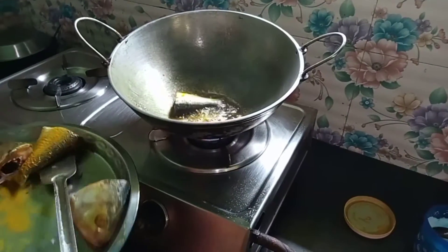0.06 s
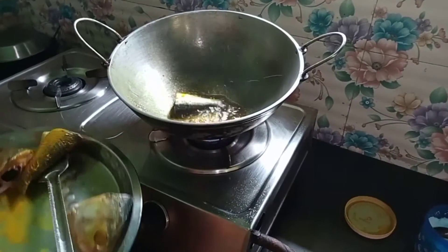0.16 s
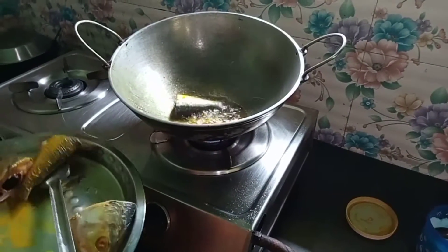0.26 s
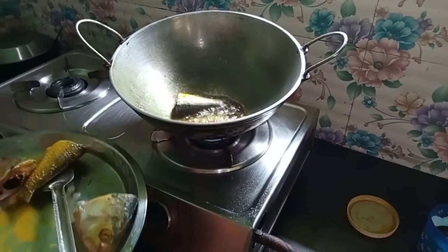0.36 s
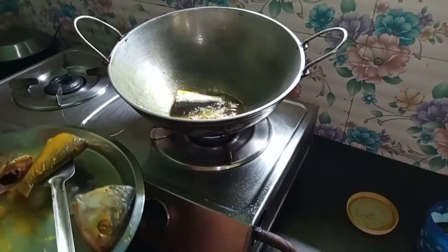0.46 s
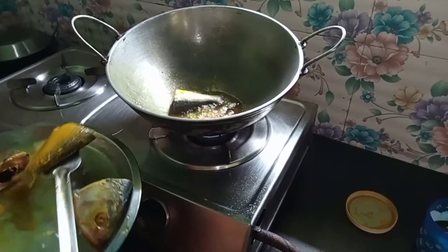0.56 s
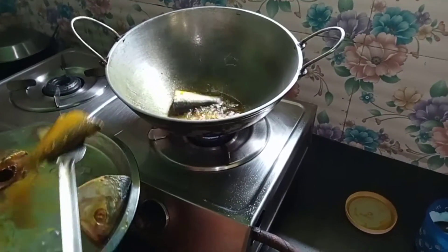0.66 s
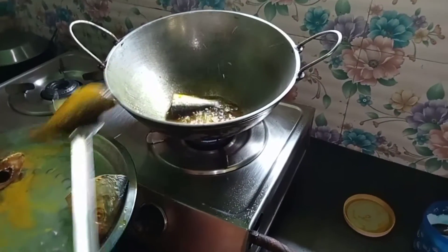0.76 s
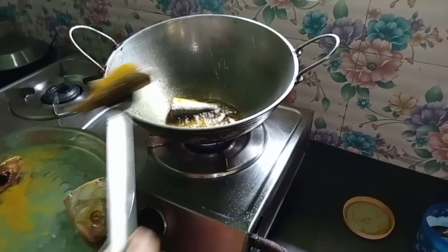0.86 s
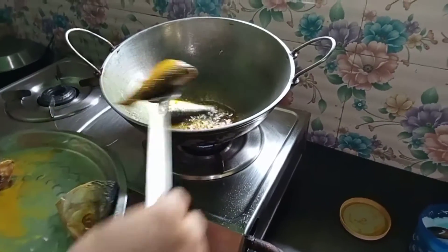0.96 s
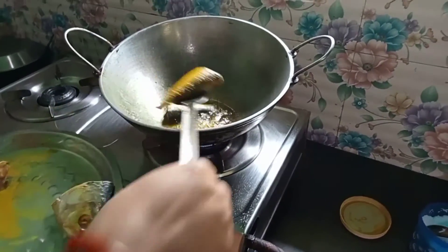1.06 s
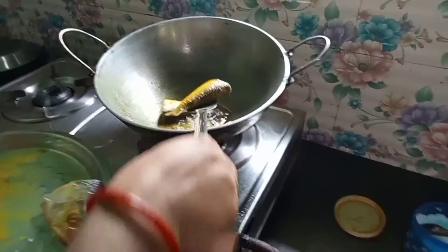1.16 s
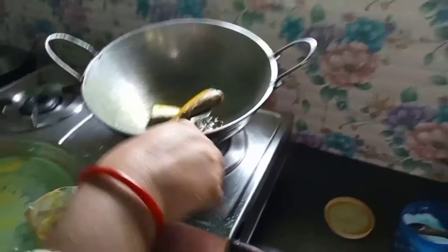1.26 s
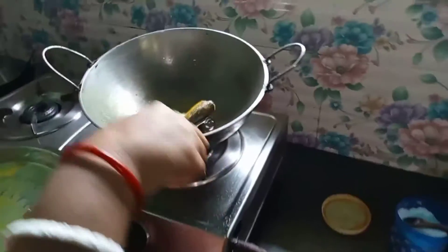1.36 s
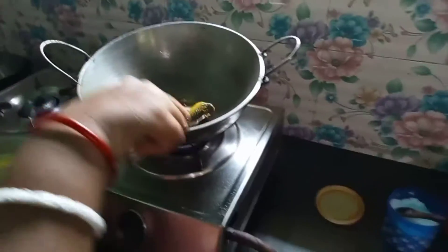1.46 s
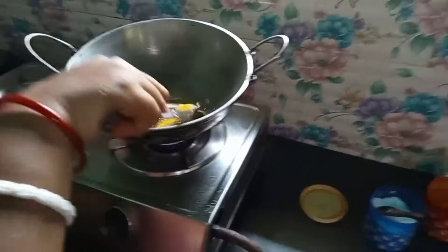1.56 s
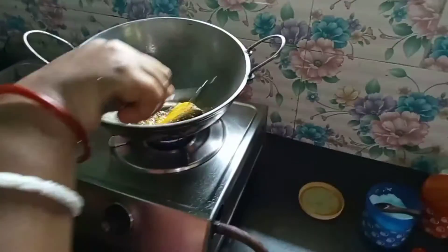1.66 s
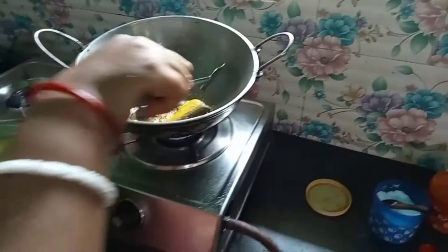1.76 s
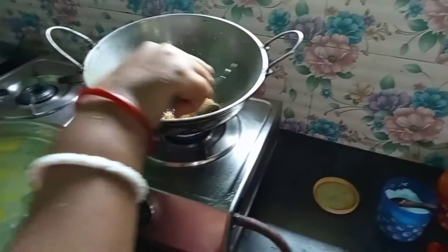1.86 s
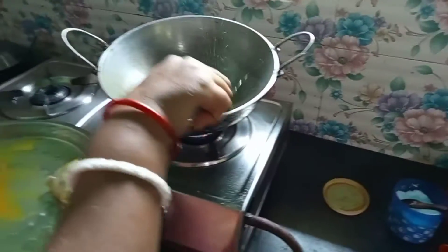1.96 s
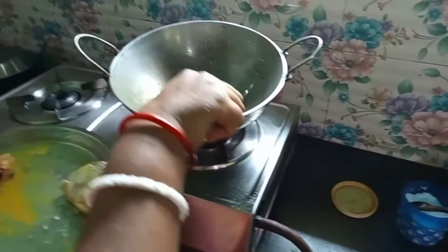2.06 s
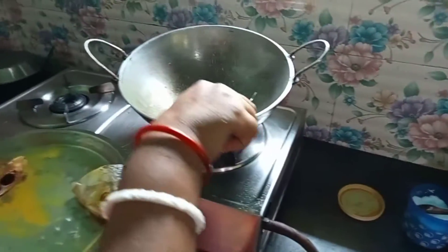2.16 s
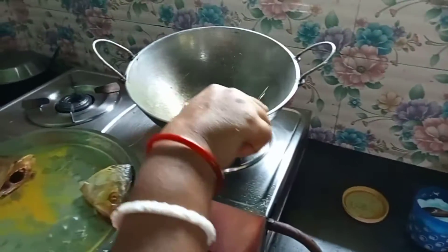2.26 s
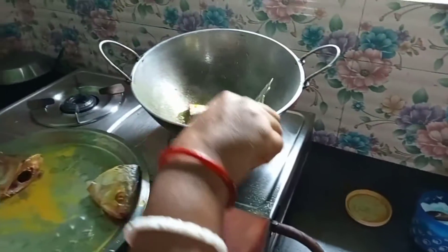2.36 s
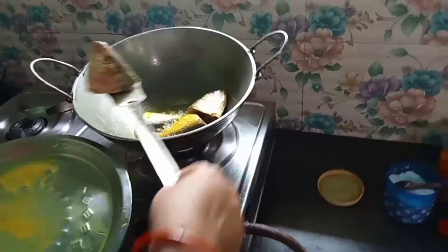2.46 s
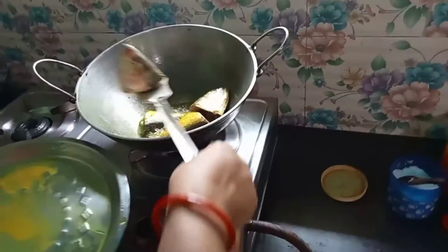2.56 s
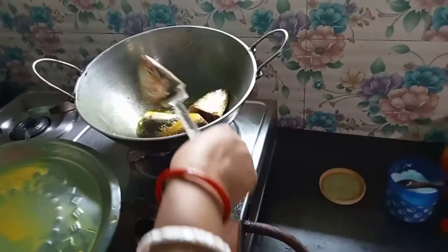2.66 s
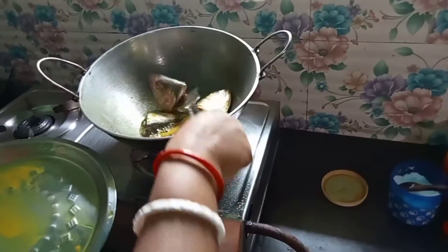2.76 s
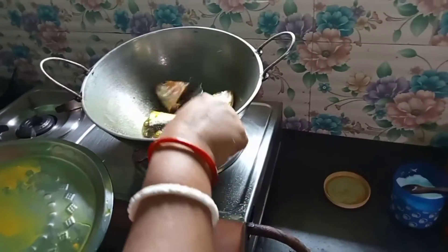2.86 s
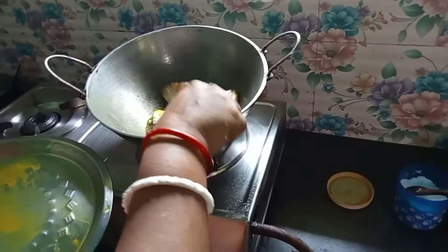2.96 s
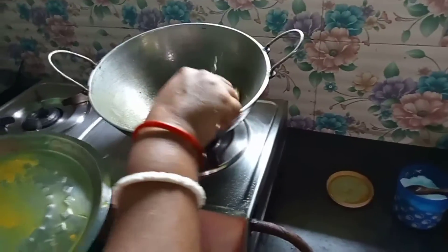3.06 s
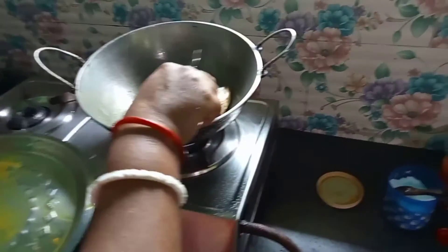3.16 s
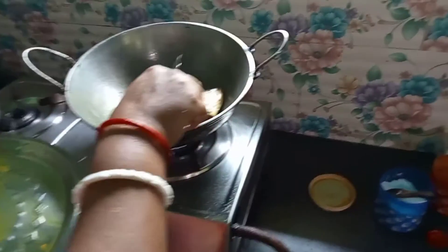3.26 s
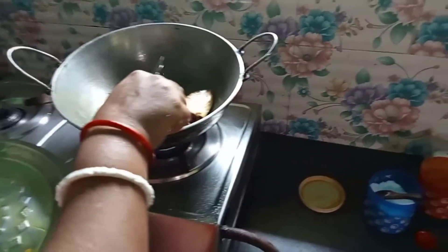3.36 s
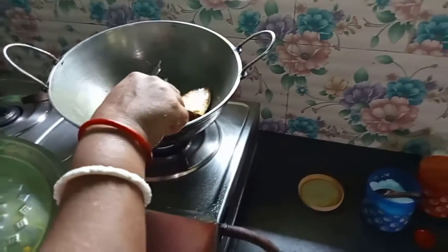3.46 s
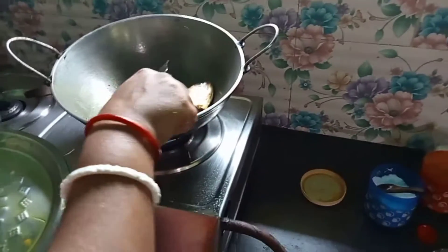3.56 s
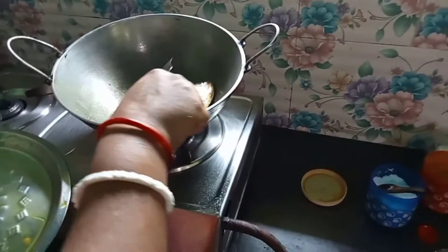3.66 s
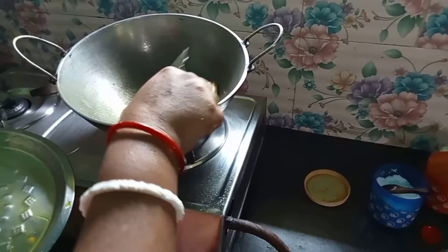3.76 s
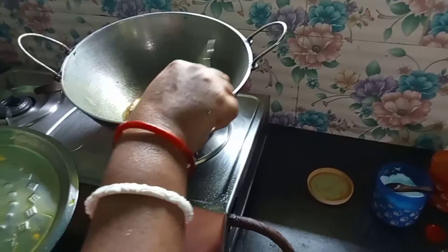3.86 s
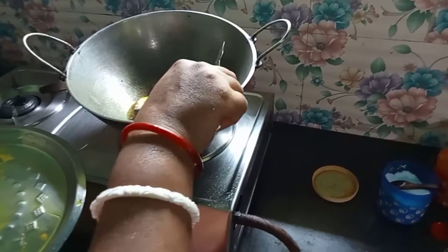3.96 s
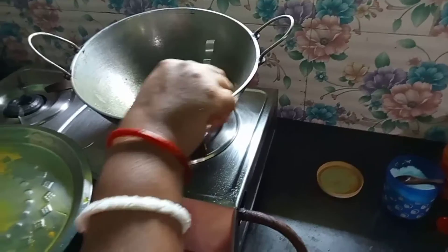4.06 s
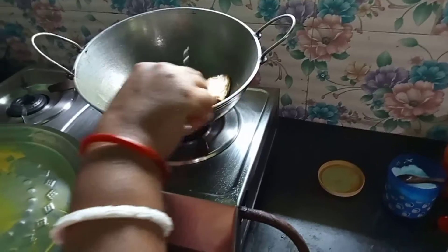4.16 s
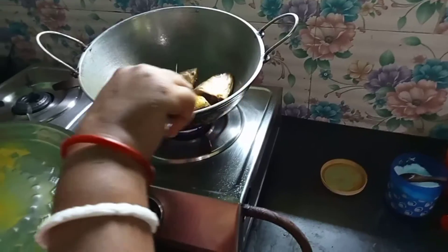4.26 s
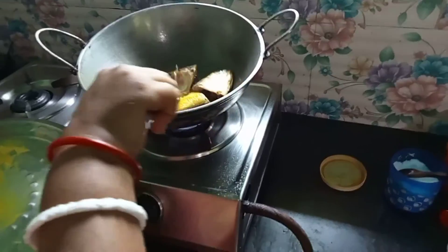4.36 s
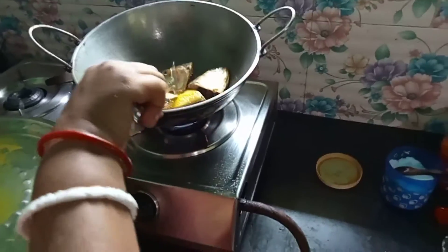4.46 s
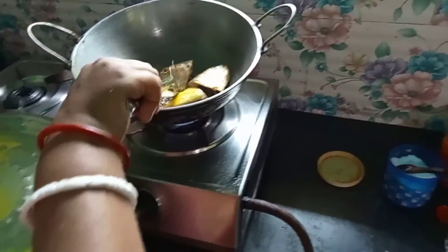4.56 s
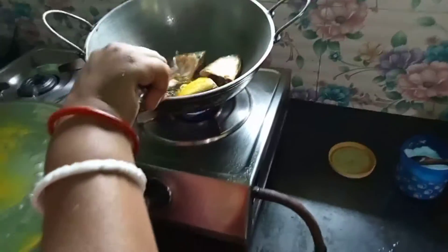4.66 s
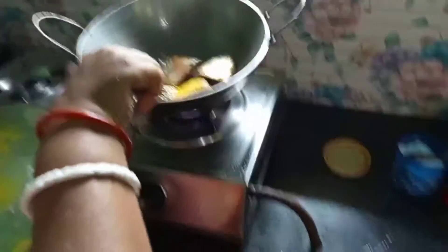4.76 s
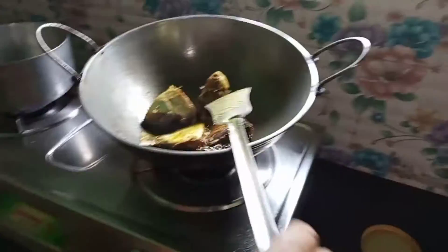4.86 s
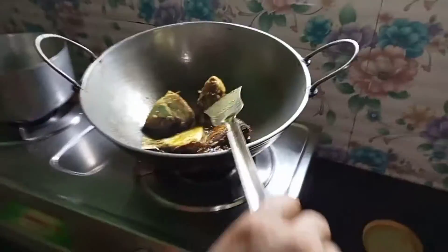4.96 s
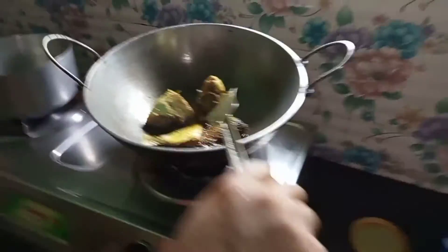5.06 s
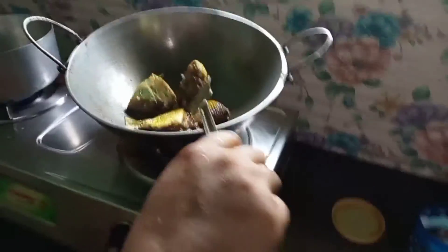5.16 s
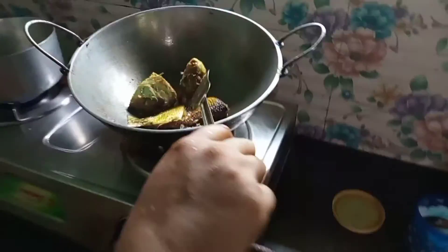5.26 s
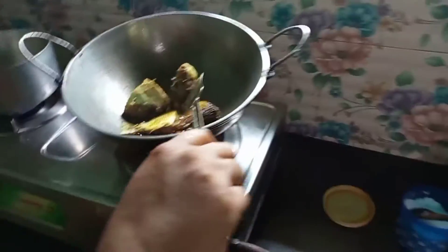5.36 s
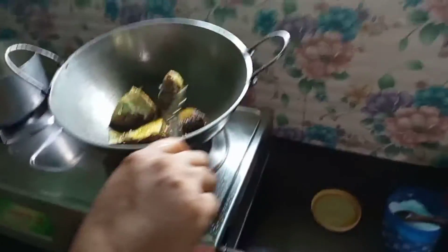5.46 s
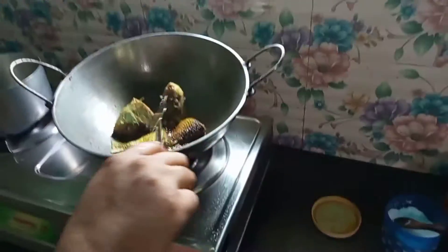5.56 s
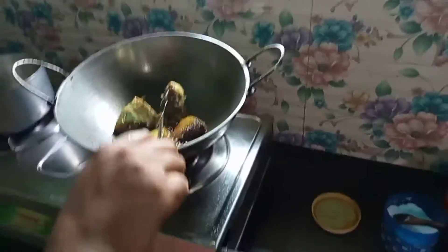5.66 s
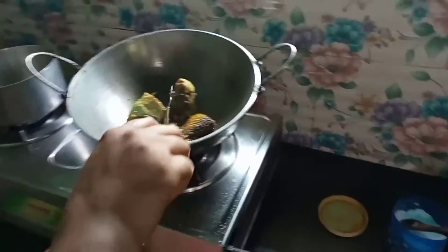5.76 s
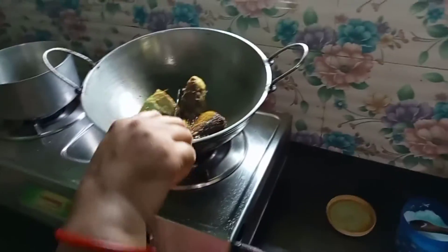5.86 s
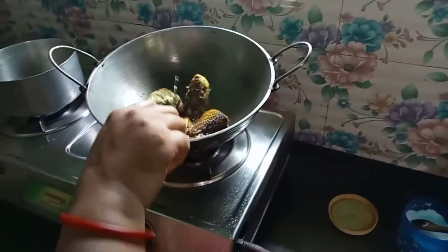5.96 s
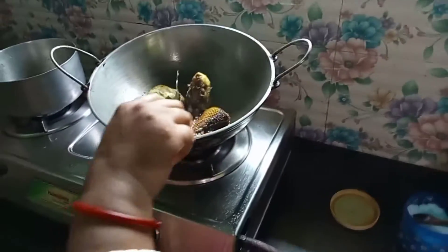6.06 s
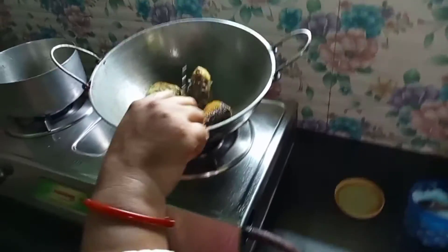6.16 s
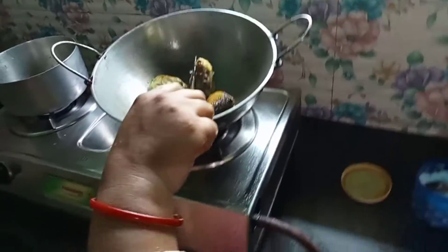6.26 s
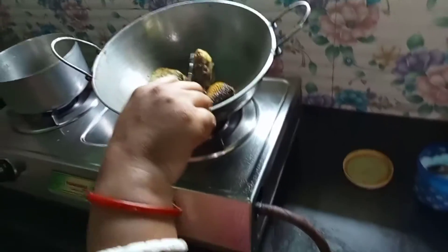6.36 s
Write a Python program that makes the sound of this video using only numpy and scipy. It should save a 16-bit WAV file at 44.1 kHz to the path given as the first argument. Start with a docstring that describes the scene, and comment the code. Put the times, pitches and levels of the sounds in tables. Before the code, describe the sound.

Close, dry sizzling of wet fish pieces in oil swells with steel scrapes and pops, then cuts to sparse crackling and fat spits.

```python
"""Fish frying in a steel pan

In a kitchen, close up with no room echo, fish fries in hot oil in a round steel pan: noise puffs for steam bubbles.
The sizzle swells as new pieces go in, then the sound cuts to a quieter, patchier boil. Fat spits in pitched
puffs and spray; a turner scrapes plate and pan as bursts in two steel registers. A phone microphone hears it
in mono, over a low kitchen rumble of filtered noise with brief hums and a few bumps."""
import sys
import numpy as np
from scipy import signal
from scipy.fft import rfft, irfft, next_fast_len
from scipy.io import wavfile
from scipy.ndimage import uniform_filter1d, map_coordinates

SR = 44100
rng = np.random.default_rng(int(sys.argv[2]) if len(sys.argv) > 2 else 0)


def put_to_file(sound):
    """Save the sound as 16-bit audio at rate SR, in the file named by the first command-line argument."""
    columns = np.atleast_2d(sound).T  # one column per channel
    safe = np.clip(columns, -1, 1)
    whole_steps = np.round(safe * 32767)
    wavfile.write(sys.argv[1], SR, whole_steps.astype(np.int16))


N = 282240
T = np.arange(N) / SR
CUT_S = 4.881  # the sound cuts here to a quieter, patchier boil


def amp(db):
    """Gain of a dB value."""
    return 10 ** (np.asarray(db) / 20)


def unit(x):
    """x at rms 1."""
    return x / np.sqrt(np.mean(x ** 2) + 1e-20)


def curves(table):
    """One value per sample for each column after the time."""
    s, *cols = np.transpose(table)
    return [np.interp(T, s, c) for c in cols]


def wobble(rate):
    """A smooth random curve, rate knots a second."""
    return map_coordinates(rng.standard_normal(int(N * rate / SR) + 4), [T * rate])


def filtered(x, response):
    """x through a response given as a function of frequency in Hz."""
    m = next_fast_len(N + 8192)
    return irfft(rfft(x, m) * response(np.fft.rfftfreq(m, 1 / SR)), m)[..., :N]


# Steady resonances of the pan: pitch_hz, width_hz, level_db
PAN_RESONANCES = [(446, 120, 4), (552, 9, 7.5), (652, 32, 7), (1142, 15, 6), (1285, 5.7, 12.5),
                  (1514, 44, 3.5), (1845, 43, 8), (2010, 9, -1), (2330, 27, 6), (2820, 10, 9.5),
                  (3023, 15, 9), (3265, 19, 7)]


def coloured(x, spectrum):
    """x at rms 1 through spectrum points on a log pitch axis, with the pan resonances added in dB."""
    points_hz, points_db = np.transpose(spectrum)

    def response(hz):
        spectrum_db = np.interp(np.log(hz + 1), np.log(points_hz + 1), points_db)
        pan_db = sum(db / (1 + (2 * (hz - centre) / width) ** 2) for centre, width, db in PAN_RESONANCES)
        return amp(spectrum_db + pan_db)

    return unit(filtered(x, response))


def narrow(length, hz, width_hz):
    """Noise of rms 1 around one pitch."""
    f = np.fft.rfftfreq(length, 1 / SR)
    resonance = 1 / (1 + (2 * (f - hz) / width_hz) ** 2)
    return unit(irfft(rfft(rng.standard_normal(length)) * resonance, length))


def bursts(rate, size, life_s, patchy_db, whistle_db):
    """Short noise puffs of random size, rate a second, on a noise bed with broad patches and narrow streaks."""
    starts = (rng.random(N) < rate / SR) * size * rng.exponential(size=N)
    puffs = signal.lfilter([1], [1, -np.exp(-1 / (life_s * SR))], starts)
    z = signal.stft(rng.standard_normal(N) * (1 + puffs), nperseg=1024)[2]

    def field(bins, frames):
        across_pitch = uniform_filter1d(rng.standard_normal(z.shape), bins, 0)
        return unit(uniform_filter1d(across_pitch, frames, 1))

    patches = patchy_db * field(12, 4)
    streaks = whistle_db * field(2, 12)
    return signal.istft(z * amp(patches + streaks), nperseg=1024)[1][:N]


def struck(times, peaks_db, t60s):
    """Envelope of sudden starts that die away, each for up to half a second."""
    env = np.zeros(N)
    for s, db, t60 in zip(times, peaks_db, t60s):
        first = round(s * SR)
        age = T[first:][:SR // 2] - s
        env[first:][:SR // 2] += amp(db - 60 * age / max(t60, .005))
    return env


def held(times, hold_s, rise_s, t60):
    """One row per event: a quick rise to 1 and an exponential release that starts hold_s after the start."""
    age = T - times[:, None]
    release_age = np.clip(age - hold_s[:, None], 0, 2)
    return np.clip(age / rise_s, 0, 1) * amp(-60 * release_age / t60)


def stacked(bed_db, shapes, peaks_db):
    """Gain of a bed and the events on top of it, added in power."""
    return np.sqrt(amp(2 * bed_db) + amp(2 * peaks_db) @ shapes ** 2)


def until_cut(times):
    """One row per event: whatever began before the cut ends there."""
    return (T < CUT_S) | (times[:, None] > CUT_S)


# Kitchen rumble, before a 0.5 dB cut and a random wobble: start_s, level_db
ROOM_LEVEL = [(0.0, -53.5), (0.9, -59.5), (1.5, -54.5), (2.1, -56.5), (2.6, -53), (2.97, -55.5), (3.8, -62),
              (4.6, -59.5), (5.0, -51.5), (5.78, -53.5), (6.4, -46.5)]
# Colour of the rumble: pitch_hz, level_db (relative)
RUMBLE_COLOUR = [(10, -40), (30, -20), (55, -27), (85, 5), (105, -8.5), (137, 3.5), (190, -5), (280, -2),
                 (400, -14), (600, -17), (900, -120)]
# Brief low hums: start_s, end_s, pitch_hz, width_hz, level_db
LOW_HUMS = [(1.35, 1.637, 269, 34, -46.5), (2.945, 3.333, 270, 75, -45), (3.022, 3.503, 122.4, 11, -51),
            (4.023, 4.215, 144, 20, -51.5), (4.9, 5.75, 133, 31, -57), (5.9, 6.225, 141, 8.9, -50)]
# Bumps on the handheld microphone: centre_s, level_db (the peak is 4.3 dB lower), pitch_hz
MICROPHONE_BUMPS = [(1.721, -34, 95), (1.752, -34, 110), (1.78, -33, 70), (2.289, -31, 170),
                    (2.468, -38, 60), (4.801, -24.5, 76), (5.305, -22.5, 256), (5.31, -35, 120)]


def kitchen():
    """Low rumble of filtered noise, brief hums of narrow noise and soft bumps of the diaphragm."""
    level_db = curves(ROOM_LEVEL)[0] - 0.5 + 0.57 * wobble(10)
    out = amp(level_db) * coloured(rng.standard_normal(N), RUMBLE_COLOUR)
    for start, end, hz, width_hz, db in LOW_HUMS:
        progress = np.clip((T - start) / (end - start), 0, 1)
        swell = np.sqrt(np.sin(np.pi * progress).clip(0))
        out += amp(db) * swell * narrow(N, hz, width_hz)
    for s, db, hz in MICROPHONE_BUMPS:
        u = 2 * np.pi * hz * (T - s)
        out += amp(db) * u * np.exp(-np.minimum(u * u / 2, 80))  # one push and pull of the diaphragm
    return out


# Turner slips, over the wobbling ring beds: start_s, low_ring_db, high_ring_db, hold_s
TURNER_SLIPS = [(0.01, -45, -25, 0.033), (0.0787, -29, -45, 0.049), (0.13, -22.5, -35, 0.048),
                (0.216, -30, -42, 0.035), (0.3, -29, -26, 0.068), (0.414, -45, -26, 0.016),
                (0.567, -20, -19, 0.036), (0.638, -39, -24, 0.02), (0.754, -24, -25, 0.034),
                (0.838, -31.5, -29, 0.031), (0.897, -44, -27, .02), (0.99, -27, -31, .02),
                (1.008, -22.5, -29, 0.057), (1.155, -47, -26, .02), (1.186, -26, -20, 0.067),
                (1.323, -29, -30, .03), (1.385, -24, -24, 0.081), (1.598, -27.5, -23.5, 0.022),
                (1.9, -35, -27, 0.036), (2.276, -25, -21, 0.032), (2.495, -29.5, -26.5, 0.056),
                (2.628, -31, -31, .05), (2.72, -44, -26, 0.018), (2.937, -33, -41, 0.023),
                (3.098, -51, -26, 0.099), (3.6, -36, -27, 0.047), (3.85, -52, -30, 0.04),
                (4.256, -41, -28, 0.048), (4.516, -45, -29, .04)]
# Colour of the lower steel ring: pitch_hz, level_db (relative)
LOW_RING_COLOUR = [(1200, -40), (1680, -16), (1780, -4.5), (2050, 0.5), (2200, -15), (3000, -82)]
# Colour of the upper steel ring: pitch_hz, level_db (relative)
HIGH_RING_COLOUR = [(1500, -87), (2000, -33), (2200, -3), (2600, -0.5), (2800, -20.5), (3800, -70)]
SLIP_RISE_S, SLIP_T60_S = 0.0012, 0.18
FLARE_STEEL_DB = -15  # steel ring of a flare, over its fizz
RING_HIGH_DB = 2.5  # upper ring bed over the undamped lower one
MORE_FISH_S, DAMPED_DB = 1.8, -2  # the lower ring is damped once more fish lies in the pan


def turner():
    """The steel rings in two registers: softly with the boil, and in slips that catch suddenly and fade."""
    s, low_db, high_db, hold = np.transpose(TURNER_SLIPS)
    catch = held(s, hold, SLIP_RISE_S, SLIP_T60_S)
    fizz_db, *_, ring_db = curves(BOIL_LEVELS)
    flare_db = np.transpose(BOIL_FLARES)[1]
    bed_db = 20 * np.log10(stacked(fizz_db + ring_db, flare_shapes(), flare_db + FLARE_STEEL_DB))
    slips = bursts(rate=170, size=.4, life_s=0.00071, patchy_db=0.4, whistle_db=3.0)
    low_bed_db = bed_db + DAMPED_DB * (T > MORE_FISH_S) + 1.3 * wobble(15)
    high_bed_db = bed_db + RING_HIGH_DB + 0.5 * wobble(13)
    low = stacked(low_bed_db, catch, low_db) * coloured(slips, LOW_RING_COLOUR)
    high = stacked(high_bed_db, catch, high_db) * coloured(slips, HIGH_RING_COLOUR)
    return low + high


# Spits of fat; levels before cuts of 12 dB (puff) and 6 dB (spray), t60_s for the puff:
# start_s, puff_db, spray_db, pitch_hz, t60_s
FAT_SPITS = [(0.4238, -4, -39, 3000, 0.12), (1.1597, -1, -39, 3040, 0.062), (4.7994, -2, -34, 3430, 0.096),
             (4.8459, -6.5, -31, 3300, 0.16), (5.0933, -11.5, -47, 3530, 0.24),
             (5.2655, -17, -55, 7440, 0.3), (5.484, -14.5, -44, 3850, 0.27), (5.5808, -3, -49, 3050, 0.056),
             (5.762, -18.5, -55, 7300, 0.25), (5.806, -22, -22, 3380, 0.08),
             (5.816, -33, -23.5, 3380, 0.12), (6.0646, -10, -48, 2700, 0.093), (6.277, -9, -28, 4140, 0.1),
             (6.314, -11, -34, 3150, 0.067), (6.3304, -15, -39, 3400, 0.08), (6.348, -9, -49, 3080, 0.089)]
# Sharp cracks of fat: start_s, level_db
FAT_CRACKS = [(5.8065, -14), (5.8144, -10)]
# Colour of the spray shower: pitch_hz, level_db (relative)
SHOWER_COLOUR = [(600, -76), (1500, -1), (3200, -4), (5000, -9), (7200, -9), (11000, -10), (14500, -13),
                 (15500, 0.5)]
# Colour of the cracks: pitch_hz, level_db (relative)
CRACK_COLOUR = [(600, -40), (1800, -9), (3200, -3), (5000, -9), (6600, 0), (9000, -8), (12000, -7),
                (14500, 0), (15500, 0)]
PUFF_WIDTH_HZ = 450


def spitting():
    """A water pocket bursts: a pitched puff and a shower of fine spray; the hardest ones crack."""
    puffs = np.zeros(N + SR)
    t = np.arange(SR // 4) / SR
    rise = 1 - np.exp(-t / .002)
    for s, db, _, hz, t60 in FAT_SPITS:
        decay = amp(db - 12.0 - 60 * t / max(t60, .005))
        sounding = (s > CUT_S) | (s + t < CUT_S)  # an earlier puff ends at the cut
        puffs[round(s * SR):][:len(t)] += decay * rise * sounding * narrow(len(t), hz, PUFF_WIDTH_HZ)
    s, _, spray_db, _, t60 = np.transpose(FAT_SPITS)
    spray_t60 = np.where(s > CUT_S, t60 * 4.7, t60 * 1.5)
    shower = struck(s, spray_db - 6, spray_t60)
    crack = struck(*np.transpose(FAT_CRACKS), np.full(len(FAT_CRACKS), .006))
    out = puffs[:N] + shower * coloured(rng.standard_normal(N), SHOWER_COLOUR)
    return out + crack * coloured(rng.standard_normal(N), CRACK_COLOUR)


# Flares of boiling as wet flesh meets the oil; the turner's steel rings with them, large bubbles 6 dB lower:
# start_s, fizz_db, hold_s, hiss_over_fizz_db, low_registers_over_fizz_db
BOIL_FLARES = [(0.04, -27, 0.017, -16, -26), (0.152, -34, 0.026, -10, -1.5), (0.49, -39.5, 0.044, -10, -1),
               (0.563, -25, 0.018, -20, -20), (0.747, -28, .02, -1, -26), (1.027, -26, 0.087, -21, -34),
               (1.574, -32, 0.018, 2, -8), (2.9, -20, .02, -10, -18), (3.03, -25, .03, -5.5, -24),
               (3.165, -33, .03, 2, -12), (3.49, -26, 0.028, -11, -32), (3.644, -23, 0.015, -12, -28),
               (3.875, -25, 0.016, -15, -17), (3.958, -24, 0.056, -16, -14.5), (4.26, -33, 0.055, -4, -18),
               (4.352, -28, 0.034, -16, -8), (4.527, -25.5, .03, -21, -26),
               (4.832, -25.5, 0.051, -7.5, -10), (5.0, -39, .02, -1, -16), (5.073, -33, 0.074, -5.5, -23),
               (5.148, -40.5, 0.046, 5, -17), (5.256, -50.5, 0.058, 12, -2), (5.332, -37, 0.061, -5, -28),
               (5.472, -30.5, 0.074, -9.5, -17), (5.563, -26.5, .07, -10.5, -19),
               (5.667, -32, 0.057, -15, -18), (5.76, -47.5, 0.049, 7, -18), (5.804, -29, 0.033, -9, -11),
               (5.938, -39.5, 0.024, 5, -4), (6.071, -28, 0.14, -25, -10), (6.299, -20.5, 0.029, -22, -20)]
FLARE_RISE_S, FLARE_T60_S = 0.013, 0.21


def flare_shapes():
    """One row per flare: the boiling rises quickly, holds and dies away; an earlier one ends at the cut."""
    s, _, hold, *_ = np.transpose(BOIL_FLARES)
    return held(s, hold, FLARE_RISE_S, FLARE_T60_S) * until_cut(s)


# Steady boil, all but fizz_db relative to the fizz; the turner plays the steel ring:
# start_s, fizz_db, hiss_db, large_bubbles_db, pan_hollow_db, steel_ring_db
BOIL_LEVELS = [(0.0, -26.5, -5, -17.5, -17, -8), (0.3, -24, -5.5, -16.5, -14, -11),
               (0.7, -27.5, -4, -21, -15.5, -5), (1.2, -23, -6, -24, -20, -10),
               (1.66, -25.5, -3.5, -19.5, -11, -7), (1.75, -20.5, -5.5, -31, -15, -15.5),
               (1.86, -21, -3.5, -18, -15, -8), (1.94, -15, -8, -20.5, -16.5, -13),
               (2.45, -18.5, -7, -22, -19, -14), (2.72, -20, -6.5, -19, -16.5, -9),
               (2.8, -23, -6, -25, -13, -14), (3.2, -23.5, -8, -20, -14, -13),
               (3.7, -25, -7, -25.5, -11, -9.5), (4.17, -25, -7, -21, -11.5, -11.5),
               (4.878, -24.5, -7.5, -21, -12, -11.5), (4.883, -26, -12, -28, -23, -20),
               (4.97, -35, -6.5, -15, -16, -15), (5.2, -37, 0, -13.5, -17, -16),
               (5.45, -37.5, -4, -14, -16.5, -18), (5.8, -38.5, 2.5, -9, -17, -16),
               (6.03, -35.5, -2, -12.5, -14, -9.5), (6.4, -30.5, -2.5, -13.5, -14, -7)]
# Finest spray over the hiss: start_s, level_db
MIST_LEVEL = [(0.0, -4), (0.8, -6.5), (1.5, -6.5), (1.9, -4.5), (2.6, -6.5), (3.4, -5.5), (4.875, -5),
              (4.885, -7), (5.1, -11.5), (5.27, -19), (5.42, -6), (5.65, -13), (5.8, -16), (5.96, -20),
              (6.04, -15), (6.15, -4), (6.4, -10)]
# Colours of fizz, hiss, finest spray and large bubbles, each: pitch_hz, level_db (relative)
FIZZ_COLOUR = [(1800, -31.5), (2400, -24), (2700, -5), (3150, -2), (3570, -2), (4090, -8.5), (4400, -10.5),
               (4900, -25), (5300, -37), (6500, -27), (11000, -120)]
HISS_COLOUR = [(3500, -36), (4800, -12), (5400, -7), (6200, -3), (7100, 4), (7700, 0), (8400, -10.5),
               (9200, -18), (12000, -120)]
MIST_COLOUR = [(6000, -75), (8000, -5.5), (8600, -4), (10000, -2), (11000, -4.5), (12000, -10.5),
               (14900, -6.5), (15500, -8)]
BUBBLE_COLOUR = [(190, -40), (330, -10.5), (540, -1.5), (800, 2.5), (950, -3), (1300, -47), (1700, 9.5),
                 (1900, -44), (3000, -120)]
# Colours of the pan's hollow, deep and then shallow, each: pitch_hz, level_db (relative)
DEEP_HOLLOW_COLOUR = [(600, -60), (920, -14), (1020, -2), (1280, 0), (1460, -2), (1530, -11), (1700, -9),
                      (1850, -25), (3000, -120)]
SHALLOW_HOLLOW_COLOUR = [(600, -64), (950, -9), (1150, -2.5), (1300, -1), (1460, -1.5), (1540, -14),
                         (1700, -12), (1850, -27), (3000, -120)]
RISE_S, RISE_LASTS_S = 3.2, .2  # the hollow turns shallow as more fish fills it, until the cut


def frying():
    """Each bubble size fills its own register; flares and boiling surges lift them together."""
    fizz_db, hiss_db, bubbles_db, hollow_db, _ = curves(BOIL_LEVELS)
    _, flare_db, _, bright_db, deep_db = np.transpose(BOIL_FLARES)
    flares = flare_shapes()
    surge_db = 0.5 * wobble(9.1) + 0.21 * wobble(40)
    small = bursts(rate=730, size=.45, life_s=0.000077, patchy_db=1.1, whistle_db=2.0)
    tiny = bursts(rate=1500, size=.25, life_s=0.00018, patchy_db=1.3, whistle_db=1.6)
    large = bursts(rate=160, size=.25, life_s=0.0003, patchy_db=1.9, whistle_db=2.0)

    fizz = stacked(fizz_db + 0.6 * wobble(16), flares, flare_db) * coloured(small, FIZZ_COLOUR)

    fine_gain = stacked(fizz_db + hiss_db + 0.32 * wobble(12), flares, flare_db + bright_db)
    mist = amp(curves(MIST_LEVEL)[0]) * coloured(tiny, MIST_COLOUR)
    hiss = fine_gain * (coloured(tiny, HISS_COLOUR) + mist)

    bubble_bed_db = fizz_db + bubbles_db + 0.52 * wobble(7.3)
    bubble_gain = stacked(bubble_bed_db, flares, flare_db + deep_db - 6)
    bubbles = bubble_gain * coloured(large, BUBBLE_COLOUR)

    filled = np.clip((T - RISE_S) / RISE_LASTS_S, 0, 1) * (T < CUT_S)
    hollow = (1 - filled) * coloured(large, DEEP_HOLLOW_COLOUR)
    hollow += filled * coloured(large, SHALLOW_HOLLOW_COLOUR)
    hollow *= stacked(fizz_db + hollow_db + 1.3 * wobble(11), flares, flare_db + deep_db)
    return amp(surge_db) * (fizz + hiss + bubbles + hollow)


def scene():
    """One microphone feeds both channels."""
    return np.tile(kitchen() + turner() + spitting() + frying(), (2, 1))


TOP_HZ = 15500


def record(dry):
    """The small microphone loses the deepest bass; nothing passes above the band limit."""
    return filtered(dry, lambda hz: (hz < TOP_HZ) / np.sqrt(1 + (50 / (hz + 1)) ** 4))


dry = scene()
out = record(dry)
put_to_file(out)
```